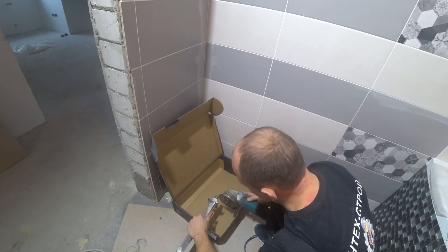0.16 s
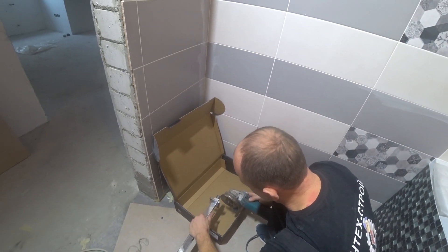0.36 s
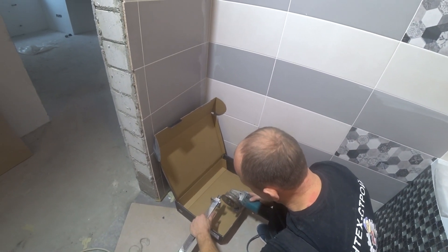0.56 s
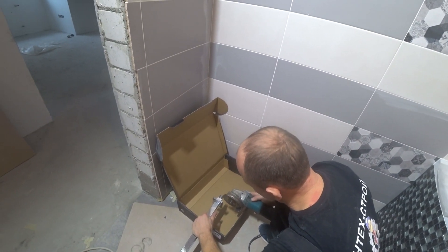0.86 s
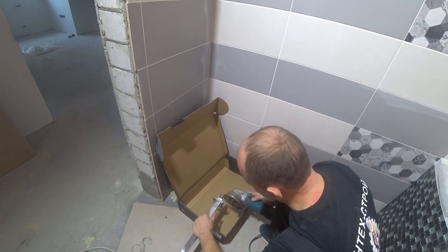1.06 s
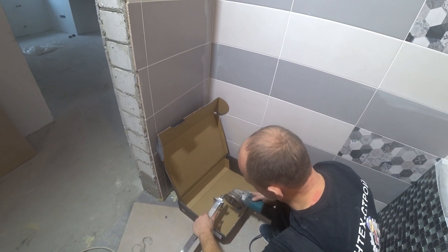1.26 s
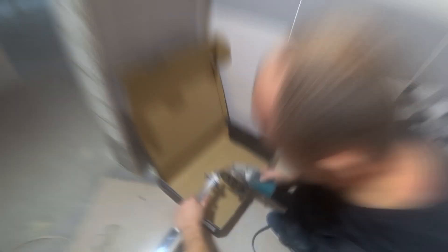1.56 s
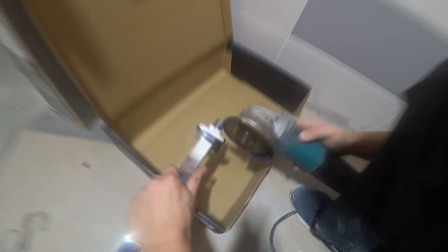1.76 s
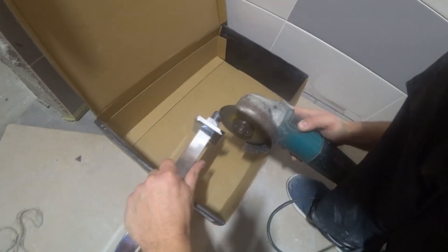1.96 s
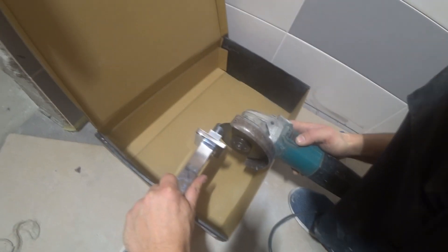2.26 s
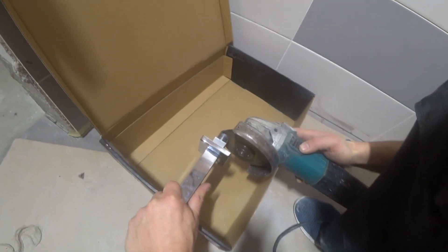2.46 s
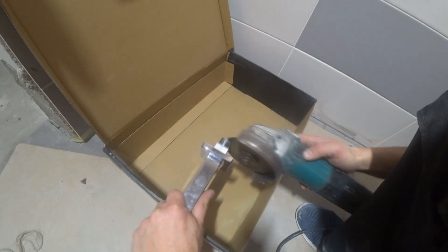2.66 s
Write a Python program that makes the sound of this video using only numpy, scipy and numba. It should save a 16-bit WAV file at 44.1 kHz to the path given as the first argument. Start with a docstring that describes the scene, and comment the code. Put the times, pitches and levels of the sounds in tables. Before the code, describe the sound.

An angle grinder cuts a metal sleeve close by in a tiled corner. From the start there is a dense, rasping hiss with metallic ringing and a few short squeals, over a faint motor hum and whine. At about 1.3 seconds the sound drops abruptly to a thinner, lighter cut. The disc sings and screeches, most around 2 seconds, and keeps cutting until the end, near 2.8 seconds.

```python
"""An angle grinder cuts a metal sleeve, close up in a tiled corner.
Grit on the disc strikes the metal in a dense, chattering hiss that rings the sleeve and the disc,
with brief squeals on top. The motor hums and whines, and its housing drones faintly underneath.
Midway the sound drops abruptly and goes on as a thinner, lighter cut in which the disc sings."""
import sys
import numpy as np
from scipy import signal
from scipy.fft import rfft, irfft, next_fast_len
from scipy.io import wavfile
from scipy.ndimage import uniform_filter1d, minimum_filter1d
from numba import njit

SR = 44100
rng = np.random.default_rng(int(sys.argv[2]) if len(sys.argv) > 2 else 0)


def file_out(sig):
    """Save sig as 16-bit WAV at sys.argv[1]."""
    # one column per channel
    cols = np.atleast_2d(sig).T
    # limit, then scale
    lim = np.clip(cols, -1, 1)
    pcm = np.round(lim * 32767).astype(np.int16)
    wavfile.write(sys.argv[1], SR, pcm)


N = 123479
T = np.arange(N) / SR
SIZE = next_fast_len(N, True)
F = np.maximum(np.fft.rfftfreq(SIZE, 1 / SR), 1)

DROP_S, DROP_FADE_S, DROP_GAIN = 1.34, .0044, .46
GEAR_RATIO, WHINE_ORDER = 3.3, 25
GRAINS_PER_S, GRAIN_SPREAD_DB = 26000, 3
TURN_DEPTH, CHATTER_DB, SURGE_DB = .035, .33, .05
TREBLE_HZ, TOP_HZ, CEILING_DB = 7830, 15850, -2

# Tone of the two cuts' hiss and of the rumble. Each row: frequency in Hz, relative level in dB.
HEAVY_COLOUR = [(410, -23), (700, -16), (850, -11.5), (1130, -7), (1430, -7.5), (2550, -5.5), (3180, -8),
                (3750, -3), (5080, -4), (7230, -8), (8500, -16), (9900, -12.5), (10700, -15), (11650, -14),
                (13300, -21.5), (15800, -26.5)]
LIGHT_COLOUR = [(470, -55), (800, -17), (880, -16), (1000, -13), (1130, -14), (1330, -9), (1500, -13),
                (1850, -8), (2270, -7.5), (2480, 0), (2760, 2.5), (3200, 3), (4770, 4), (6350, 0),
                (7500, -5.5), (8680, -10.5), (13000, -11.5), (15800, -22)]
RUMBLE_COLOUR = [(25, -4.5), (60, -6.5), (120, -5), (200, -3.5), (320, -3.5), (500, 3.5), (700, -0.5),
                 (1200, -16.5), (3000, -22.5)]
# Faders for the hiss. Each row: time in seconds, then rasp, middle and treble in dB before trim.
HEAVY_FADERS = [(0, -20.5, -12.5, -24.5), (0.1, -18, -13.5, -24), (0.17, -22, -13.5, -23.5),
                (0.26, -21, -13.5, -26.5), (0.33, -22.5, -13.5, -23), (0.39, -19.5, -16.5, -27),
                (0.46, -19.0, -16, -24.5), (0.51, -22, -16, -25), (0.59, -17, -17, -24),
                (0.67, -18.5, -15.5, -23), (0.75, -22, -12, -22), (0.81, -21.5, -14, -24),
                (0.87, -19.5, -15, -24.5), (0.95, -16.5, -17.5, -21.5), (1.0, -24.5, -15, -24.5),
                (1.05, -15, -14.5, -23), (1.11, -20.5, -18.5, -21.5), (1.19, -22.5, -14.0, -22),
                (1.27, -22, -14.5, -25.5), (1.33, -21, -12, -21.5)]
LIGHT_FADERS = [(1.35, -41, -26, -31.5), (1.45, -29, -23.5, -30.5), (1.55, -29, -21, -31),
                (1.65, -31, -20.5, -28), (1.74, -32.5, -20, -28.5), (1.82, -32, -18.5, -26.5),
                (1.92, -33, -21, -25.5), (2.03, -42, -22, -25), (2.22, -47, -21, -26),
                (2.35, -42, -19.5, -24.5), (2.48, -46, -19, -24.5), (2.56, -30.5, -18, -26.5),
                (2.8, -31, -20, -27)]
# The moving lower edge of the hiss. Each row: time in seconds, cutoff in Hz.
LOW_EDGE = [(0, 720), (.3, 790), (.5, 690), (.58, 624), (.8, 760), (.92, 524), (1.05, 616), (1.15, 730),
            (1.33, 780), (1.46, 680), (1.58, 900), (1.66, 850), (1.72, 1060), (1.82, 1230), (1.9, 890),
            (2.02, 1050), (2.48, 1170), (2.58, 1000), (2.8, 790)]
# Resonances of sleeve, disc and housing, a high zing, and screeches as the disc grazes the slot.
# Each row: frequency in Hz, width in Hz, relative level in dB.
SLEEVE_MODES = [(875, 26, -5.5), (1129, 27.6, -3), (1273, 22, -7), (1600, 23, -7), (1770, 30, -9),
                (1971, 28, -5.5), (2568, 20, -5.5), (3540, 130, -4), (3732, 48, 2), (4080, 20, 0),
                (4802, 50, -5), (5314, 16, -2), (5856, 55, -7), (7000, 150, -10)]
DISC_MODES = [(1103, 50, -10), (1300, 35, -12), (1782, 40, -3), (1950, 45, -2), (2118, 24, -8),
              (2690, 100, -4), (3722, 45, 1.5), (4218, 30, -4), (4780, 50, -5), (5330, 45, -1.5),
              (6200, 110, -8), (7000, 40, -3)]
HOUSING_MODES = [(171, 27, -12), (333, 13, -5), (384, 8.4, -1)]
ZING_MODES = [(9830, 170, 0)]
SCREECH_MODES = [(5990, 50, -6), (6330, 35, -1), (6500, 30, 0), (6730, 70, -4), (7050, 45, -4),
                 (7250, 70, -9), (7960, 57, -9)]
# Faders for the ringing, the rumble and the motor. Each row: time in seconds, relative level in dB.
SLEEVE_FADER = [(0, -20), (.2, -23.5), (.42, -21), (.54, -19), (.8, -22), (1.1, -22), (1.33, -21),
                (1.345, -32), (1.5, -26), (1.68, -37), (2.0, -49), (2.45, -48), (2.6, -33), (2.8, -29.5)]
DISC_FADER = [(0, -33), (1.33, -24.5), (1.55, -34.5), (1.8, -29), (2.1, -29.5), (2.3, -33), (2.55, -29.5),
              (2.8, -26.5)]
ZING_FADER = [(0, -38), (.15, -29), (.3, -30.5), (.45, -40), (.58, -37), (.68, -29), (.8, -30.5),
              (.94, -44), (1.4, -70)]
SCREECH_FADER = [(1.5, -55), (1.7, -34), (1.88, -29), (2.04, -29), (2.16, -30), (2.27, -38), (2.6, -50)]
RUMBLE_FADER = [(0.0, -46.5), (0.23, -55.5), (0.53, -56), (0.54, -50), (0.76, -54.5), (1.31, -54),
                (1.36, -63.5), (1.89, -59), (1.95, -61.5), (2.17, -63.5), (2.74, -56.5), (2.8, -62)]
HUM_FADER = [(0, -80), (.1, -44.5), (.25, -62), (.46, -42), (.56, -66), (1.4, -70), (1.5, -58),
             (1.58, -46.5), (1.66, -47), (1.74, -58.5), (1.83, -51), (2.05, -58), (2.35, -57.5),
             (2.57, -56.5), (2.66, -45.5), (2.74, -40), (2.8, -45)]
WHINE_FADER = [(0, -60), (.66, -53), (.76, -44), (1.04, -42.5), (1.13, -39.5), (1.33, -40.5), (1.4, -46.5),
               (1.53, -52), (1.63, -43), (1.83, -44), (1.96, -32.5), (2.08, -43), (2.5, -50), (2.8, -56)]
# The motor's speed. Each row: time in seconds, turns per second.
MOTOR_SPEED = [(0, 562), (.45, 561), (.75, 567), (1.3, 567), (1.7, 565), (1.88, 565.5), (1.98, 560.5),
               (2.4, 561), (2.8, 567)]
# Short drones of the housing and squeals of the cut.
# Each row: centre in seconds, length in seconds, pitch in Hz, relative peak level in dB.
DRONES = [(.08, 0.1, 335, -58), (.41, 0.09, 335, -58), (1.28, 0.14, 330, -58.5), (1.96, 0.13, 400, -56),
          (2.06, 0.069, 402, -57), (2.33, 0.32, 395, -65)]
SQUEALS = [(.17, .16, 3730, -28), (.54, .08, 3745, -27), (.7, .14, 3725, -29), (.87, .08, 3712, -29),
           (1.382, .045, 1785, -31), (1.42, 0.059, 1986, -32), (1.48, .1, 3715, -31),
           (1.53, 0.076, 7070, -33), (1.69, .14, 6195, -31), (1.75, 0.09, 6755, -29),
           (1.78, 0.065, 3725, -32), (1.81, 0.094, 2110, -30), (1.82, .08, 1937, -33),
           (1.89, .09, 1780, -31), (1.99, .14, 1776, -34), (1.93, .12, 5800, -31), (1.96, .13, 5990, -28),
           (1.95, 0.2, 6720, -28.5), (2.06, 0.12, 2925, -34), (2.08, .16, 2115, -38),
           (2.115, 0.18, 6500, -25.5), (2.2, 0.065, 6287, -28), (2.23, .11, 7655, -33),
           (2.3, 0.2, 3085, -32), (2.36, .26, 3725, -33), (2.42, .12, 2737, -33), (2.48, 0.11, 3085, -30),
           (2.57, .32, 6165, -29.5), (2.59, .12, 4218, -31), (2.71, .2, 3400, -30), (2.72, .18, 3710, -30),
           (2.76, 0.16, 2680, -29)]
# Stereo width from the walls. Each row: frequency in Hz, gain of the side signal in dB.
WIDTH = [(60, -17), (110, -18), (220, -36), (380, -9.5), (700, -8), (1290, -8.5), (2380, -7), (4400, -10.5),
         (9500, -10.5), (12000, -10.5), (15000, -47)]


def undb(db):
    """Decibels to gain."""
    return 10 ** (np.asarray(db) / 20)


def curve(rows):
    """Each column of a table as a curve over time."""
    times, *columns = np.array(rows, float).T
    return np.squeeze([np.interp(T, times, column) for column in columns])


def colour(points):
    """An EQ curve through (Hz, dB) points."""
    hz, db = np.array(points, float).T
    return undb(np.interp(np.log(F), np.log(hz), db))


def modes(rows):
    """Response of a set of resonances, with dark valleys between them."""
    return np.sqrt(sum(undb(2 * db) / (1 + ((F - hz) / width) ** 2) ** 2 for hz, width, db in rows))


def through(x, response):
    """Filter by a frequency response and scale to rms 1."""
    filtered = irfft(rfft(x, SIZE) * response, SIZE)[:N]
    return filtered / np.sqrt(np.mean(filtered ** 2))


def lowpass(hz, order):
    """A low-pass response, 6 dB per octave for each order."""
    return 1 / np.sqrt(1 + (F / hz) ** (2 * order))


def wander(hz):
    """Smooth random movement of rms 1, up to about the given rate."""
    return through(rng.standard_normal(N), lowpass(hz, order=2))


@njit
def highpass(x, hz, damping):
    """State-variable high-pass with a moving cutoff."""
    out, band_state, low_state = np.empty(len(x)), 0., 0.
    for i in range(len(x)):
        tuning = np.tan(np.pi * hz[i] / SR)
        band = (band_state + tuning * (x[i] - low_state)) / (1 + tuning * (tuning + damping))
        out[i] = x[i] - damping * band - low_state - tuning * band
        band_state = 2 * band - band_state
        low_state += 2 * tuning * band
    return out


def grit(contact):
    """Countless grains strike the metal, harder as the disc presses on."""
    hits = rng.random(N) < GRAINS_PER_S / SR
    return contact * hits * rng.standard_normal(N) * undb(GRAIN_SPREAD_DB * rng.standard_normal(N))


def echoes(x, t60_s, db):
    """Dense, short reflections that start 2 ms after the sound."""
    tail = rng.standard_normal(N) * undb(-60 * T / t60_s) * (T > .002)
    return undb(db) * through(x, rfft(tail, SIZE)) * np.std(x)


def hiss(strikes, spectrum, faders, split_hz, trim_db, flicker_db):
    """The strikes blur into rasp, middle and treble, each flickering around its own fader."""
    rasp, below_treble = lowpass(split_hz, order=14), lowpass(TREBLE_HZ, order=6)
    middle = np.sqrt(1 - rasp ** 2) * below_treble
    treble = np.sqrt(1 - below_treble ** 2)
    return sum(through(strikes, colour(spectrum) * band) * undb(db + trim + flicker_db * wander(37))
               for band, db, trim in zip((rasp, middle, treble), curve(faders), trim_db))


def heavy_cut(strikes):
    """A full, rasping hiss, thickened by echoes off the tiled walls."""
    return hiss(strikes + echoes(strikes, t60_s=.14, db=-8), HEAVY_COLOUR, HEAVY_FADERS,
                split_hz=3040, trim_db=(-.44, -2.5, .54), flicker_db=.95)


def ringing(contact, resonances, fader, sway_db):
    """Grit rings a set of resonances, with a level that sways."""
    return through(grit(contact), modes(resonances)) * undb(curve(fader) + sway_db * wander(8.6))


def rumble():
    """The housing and the room rumble faintly under the cut."""
    body = undb(3.5) * through(rng.standard_normal(N), colour(RUMBLE_COLOUR))
    housing = undb(-6.5) * through(rng.standard_normal(N), modes(HOUSING_MODES))
    return (body + housing) * undb(curve(RUMBLE_FADER))


def tone(hz, waver, waver_hz):
    """A sine of rms 1 whose pitch wavers by the fraction `waver`."""
    cycles = np.cumsum(hz * (1 + waver * wander(waver_hz))) / SR
    return np.sqrt(2) * np.sin(2 * np.pi * cycles)


def motor(speed):
    """The armature hums once a turn and whines at a high multiple; both waver."""
    hum = tone(speed, waver=.012, waver_hz=32) * undb(curve(HUM_FADER) + wander(29))
    whine = tone(WHINE_ORDER * speed, waver=.0034, waver_hz=150)
    return hum + whine * undb(curve(WHINE_FADER) + 2.5 * wander(60))


def swells(rows, waver, flutter_db):
    """Tones that swell and die away, each wavering and fluttering on its own."""
    out = np.zeros(N)
    for centre, length, hz, db in rows:
        swell = np.cos(np.pi * np.clip((T - centre) / length, -.5, .5))
        out += swell * tone(hz, waver, waver_hz=66) * undb(db + flutter_db * wander(65))
    return out


def drones():
    """The housing sounds short, low, unsteady notes."""
    return undb(3.5) * swells(DRONES, waver=.026, flutter_db=2.5)


def squeals():
    """The disc briefly excites one resonance at a time into a squeal."""
    return undb(-1) * swells(SQUEALS, waver=.002, flutter_db=3.5)


def light_cut(strikes, shift_s=.24):
    """A thinner hiss; the moving microphone passes from one pattern of near echoes to the next."""
    near = np.zeros(N)
    for centre in np.arange(0, T[-1] + shift_s, shift_s):
        crossfade = np.cos(np.pi / 2 * np.clip((T - centre) / shift_s, -1, 1))
        near += crossfade * echoes(strikes, t60_s=.086, db=-6.5)
    return hiss(strikes + near, LIGHT_COLOUR, LIGHT_FADERS,
                split_hz=2110, trim_db=(-3, -2, .8), flicker_db=.25)


def cutting(contact):
    """Heavy, then light cutting, while the sleeve and the disc ring, zing and screech."""
    strikes = grit(contact)
    cut = np.where(T < DROP_S, heavy_cut(strikes), light_cut(strikes))
    cut += ringing(contact, SLEEVE_MODES, SLEEVE_FADER, sway_db=.9)
    for damping in (1.93, 1.41, .52):  # three stages make one steep low cut
        cut = highpass(cut, curve(LOW_EDGE), damping)
    disc = ringing(contact, DISC_MODES, DISC_FADER, sway_db=1)
    screech = ringing(contact, SCREECH_MODES, SCREECH_FADER, sway_db=1.8)
    zing = ringing(contact, ZING_MODES, ZING_FADER, sway_db=2)
    return cut + disc + screech + zing


def scene():
    """The disc rubs harder once a turn and chatters; the whole mix dips briefly at the drop."""
    speed = curve(MOTOR_SPEED)
    disc_angle = 2 * np.pi * np.cumsum(speed / GEAR_RATIO) / SR
    chatter = undb(CHATTER_DB * wander(110) + SURGE_DB * wander(22))
    contact = (1 + TURN_DEPTH * np.sin(disc_angle)) * chatter
    mid = squeals() + drones() + cutting(contact) + rumble() + motor(speed)
    walls = cutting(contact) + rumble()  # fresh noise stands for the wall echoes that widen the sound
    side = irfft(rfft(walls, SIZE) * colour(WIDTH), SIZE)[:N]
    dip = np.clip(abs(T - DROP_S) / DROP_FADE_S, DROP_GAIN, 1)
    return dip * np.array([mid + side, mid - side])


def record(dry):
    """A fast limiter holds down the highest peaks; a steep low-pass takes off the top."""
    gain = np.minimum(1, undb(CEILING_DB) / abs(dry).max(axis=0))
    gain = uniform_filter1d(minimum_filter1d(gain, size=129), size=129)
    top_cut = signal.ellip(12, .1, 90, TOP_HZ, fs=SR, output="sos")
    return signal.sosfilt(top_cut, dry * gain)


dry = scene()
out = record(dry)
file_out(out)
```